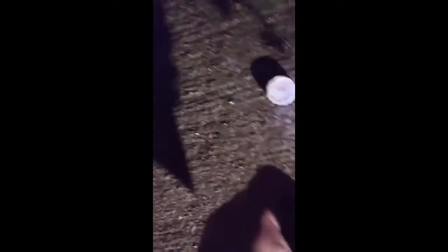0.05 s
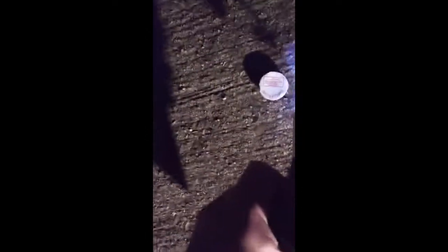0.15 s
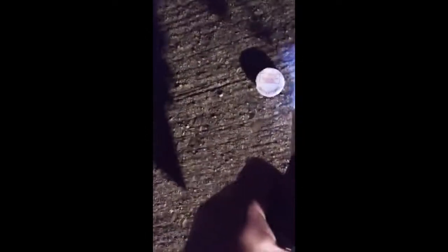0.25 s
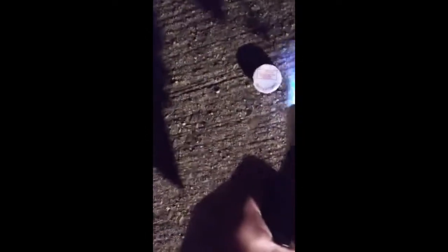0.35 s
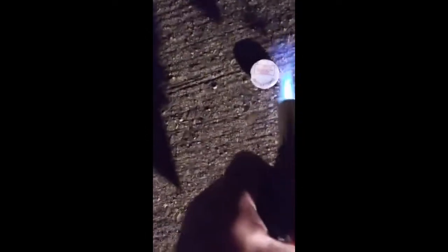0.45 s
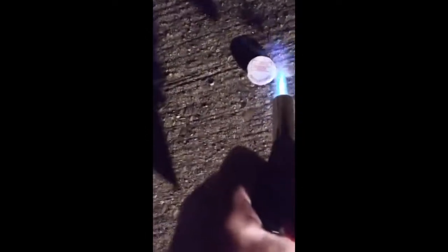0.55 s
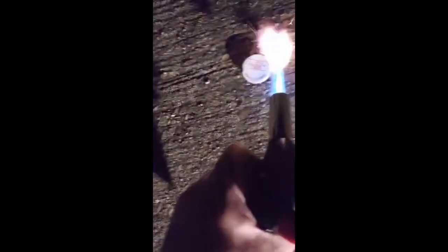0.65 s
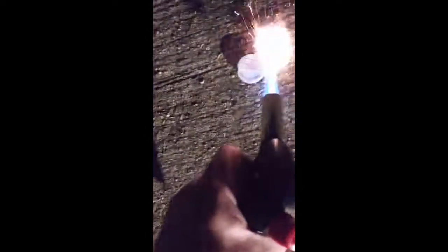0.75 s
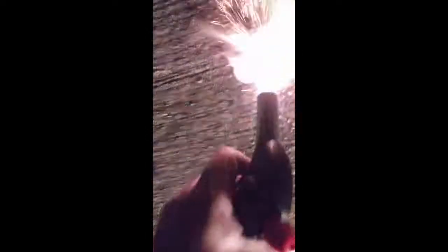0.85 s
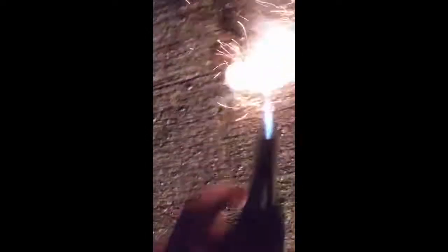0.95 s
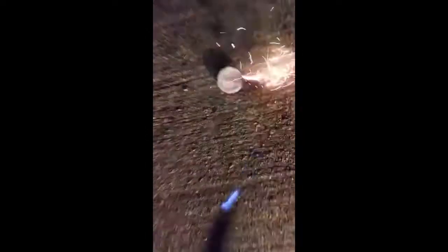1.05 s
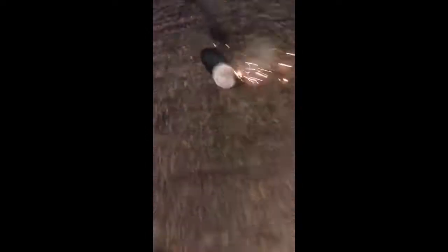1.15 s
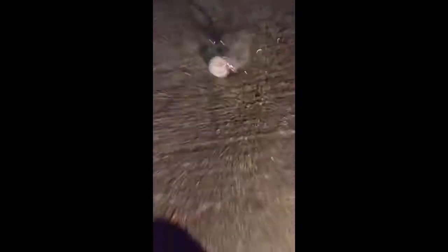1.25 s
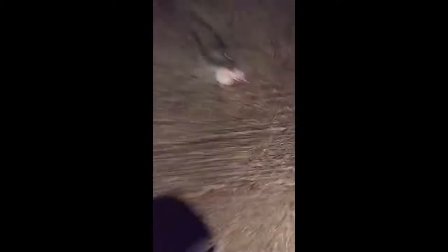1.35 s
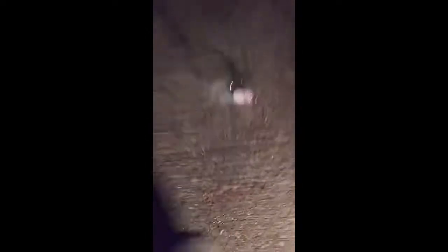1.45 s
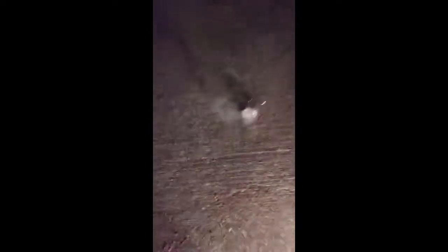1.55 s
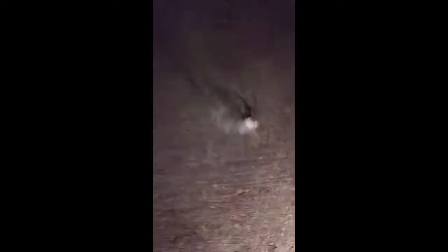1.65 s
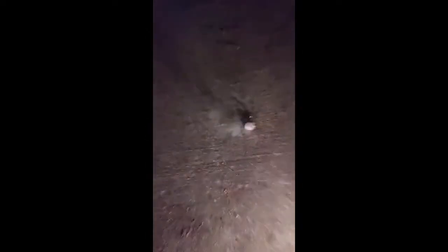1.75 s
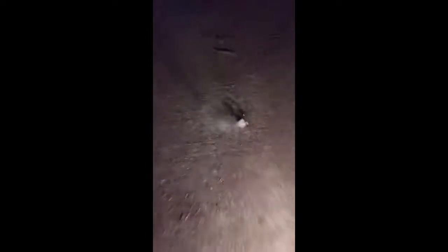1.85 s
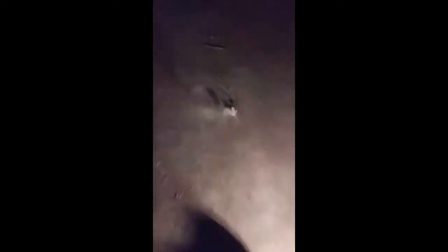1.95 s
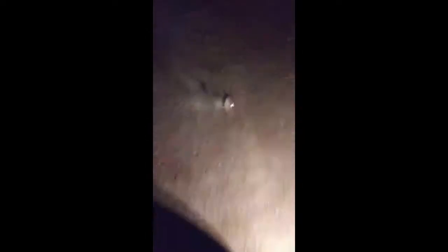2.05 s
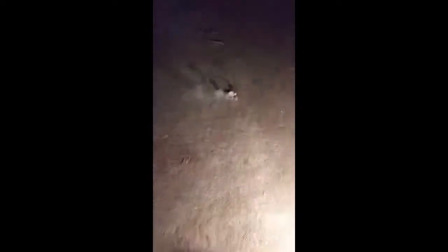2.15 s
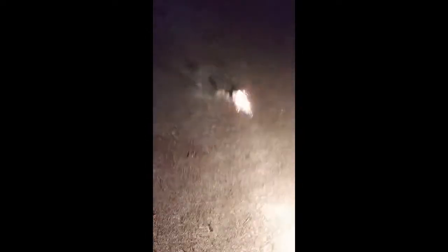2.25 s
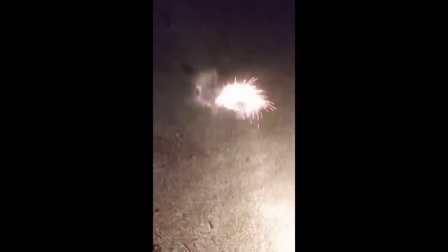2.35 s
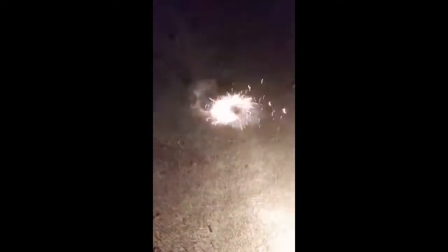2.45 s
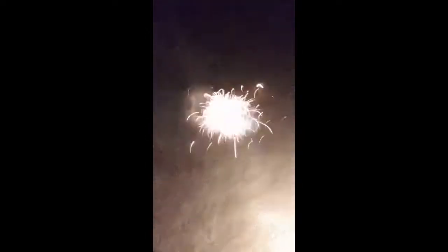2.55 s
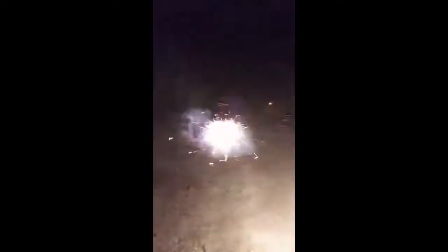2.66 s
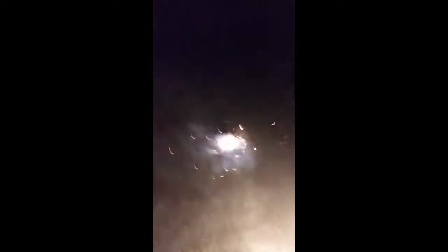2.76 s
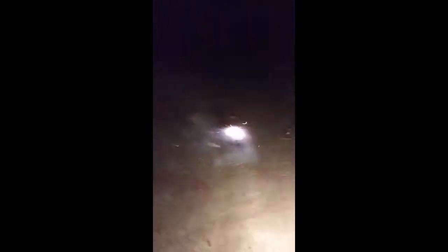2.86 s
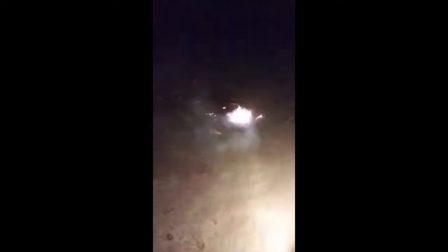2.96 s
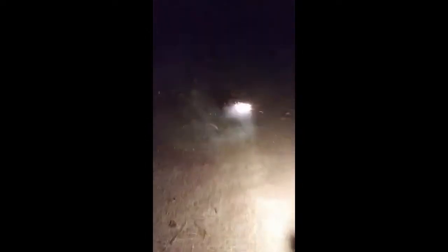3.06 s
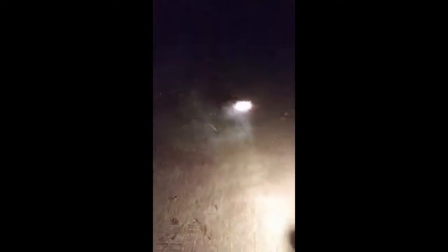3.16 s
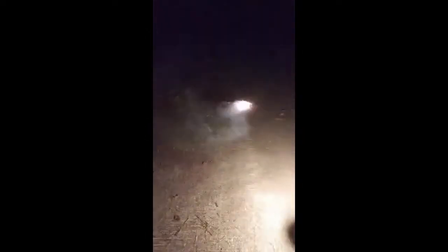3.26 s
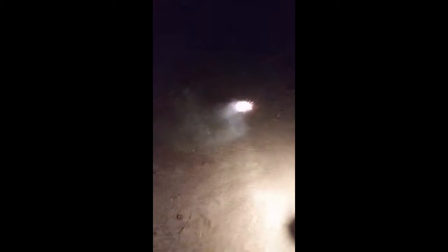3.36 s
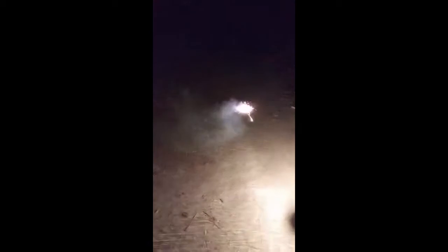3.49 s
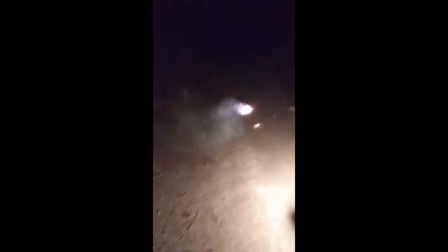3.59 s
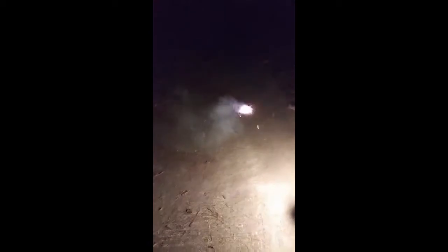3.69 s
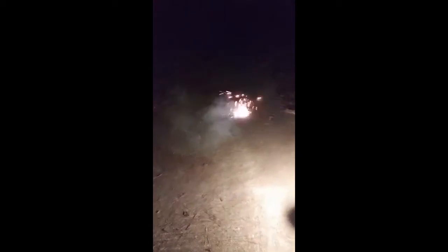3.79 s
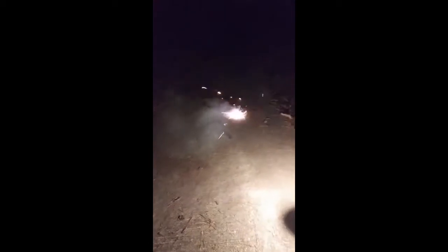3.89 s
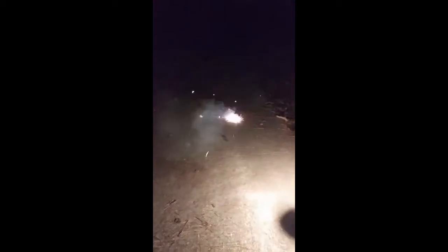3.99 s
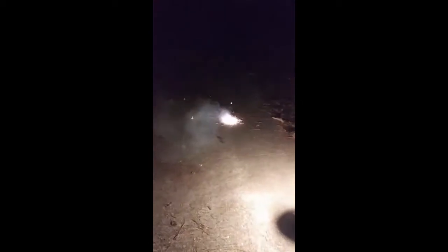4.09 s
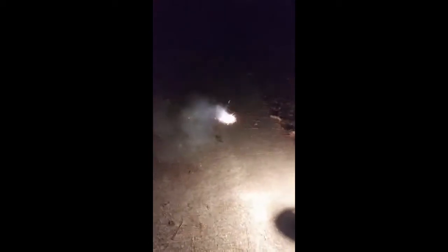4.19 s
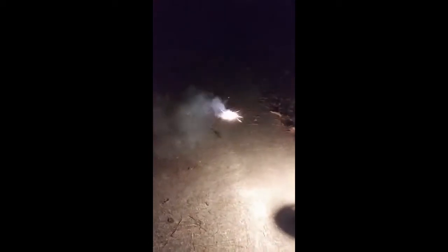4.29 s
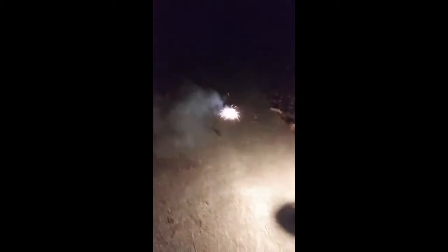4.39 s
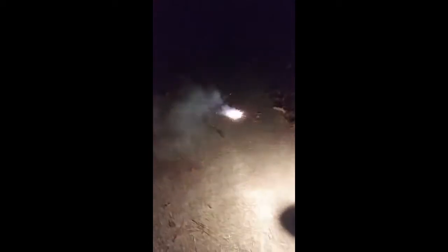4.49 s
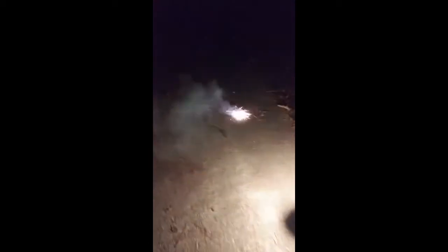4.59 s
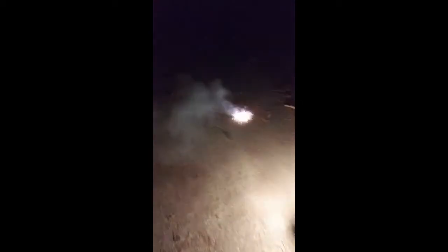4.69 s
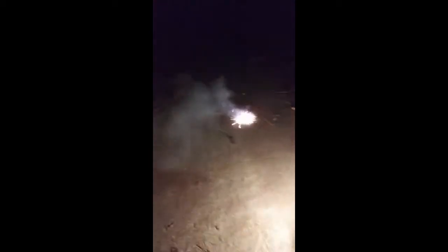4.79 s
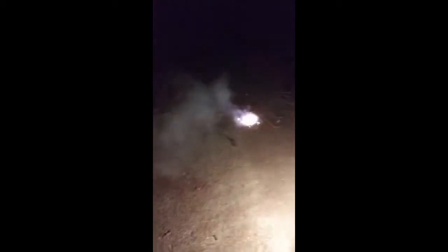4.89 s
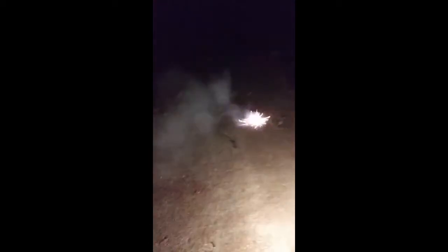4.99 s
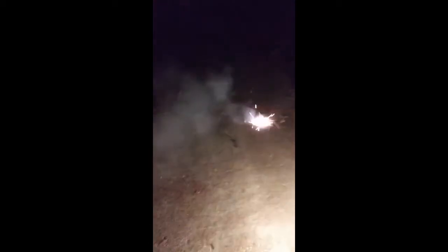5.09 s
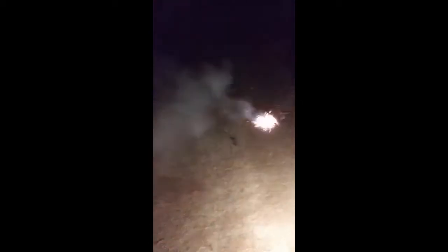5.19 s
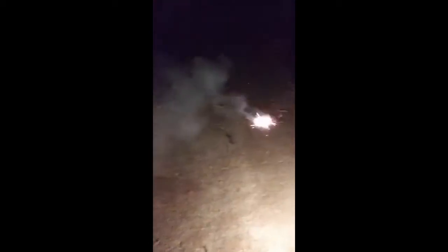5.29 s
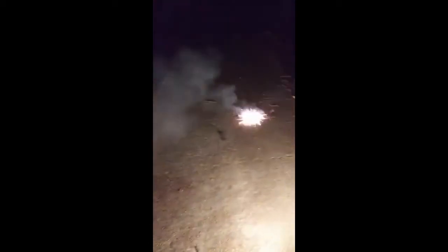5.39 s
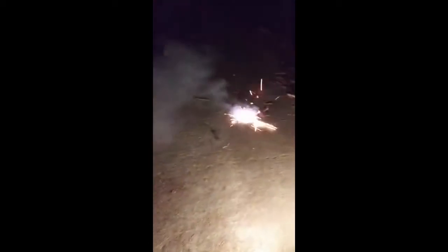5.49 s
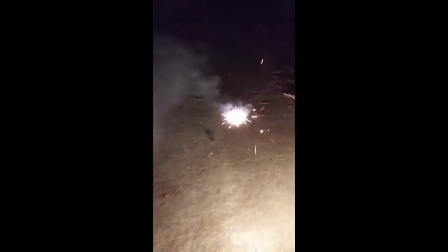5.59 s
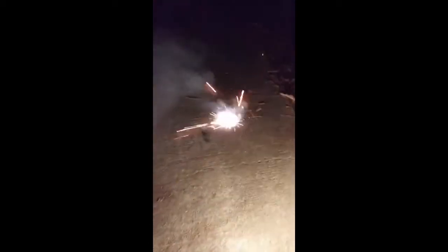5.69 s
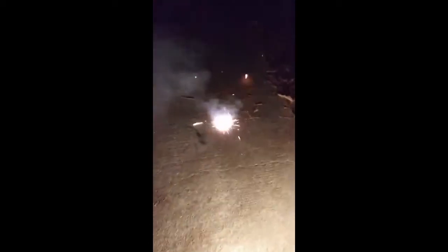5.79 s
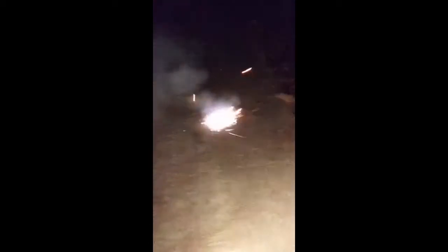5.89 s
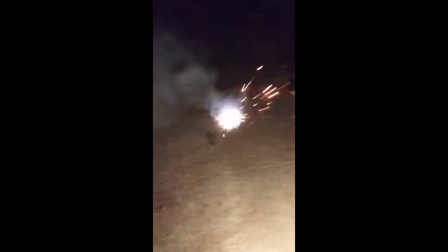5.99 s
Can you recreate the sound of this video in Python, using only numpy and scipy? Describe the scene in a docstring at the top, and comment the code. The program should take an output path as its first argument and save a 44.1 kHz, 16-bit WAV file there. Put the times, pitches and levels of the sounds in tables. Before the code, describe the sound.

Outdoors at night on concrete, a handheld gas torch roars steadily right by the microphone for a second, then shuts off with a loud sharp click. A fuse ticks and spits faintly among small handling knocks. The little firework suddenly bursts into a loud, bright, surging hiss, dies back with a tiny whistle, and continues as a quieter, uneven sizzle over faint distant traffic hum.

```python
"""A gas torch roars close by, lights a small ground firework on concrete and is clicked off.
The fuse smoulders and spits, the charge flares into a loud hiss and settles to a steady burn.
Flame, gas and powder are shaped noise; clicks and knocks are damped modes struck by short blows.
Reflections near the hand-held camera comb the burn; distant traffic hums through the night."""
import sys
import numpy as np
from scipy import signal
from scipy.fft import rfft, irfft, next_fast_len
from scipy.io import wavfile

SR = 44100
rng = np.random.default_rng(int(sys.argv[2]) if len(sys.argv) > 2 else 0)


def digitize_waveform(pressure):
    """Quantize a signal to 16-bit integers and store it at the path in sys.argv[1].

    Rows of a 2-D input are taken as channels; values are limited to [-1, 1].
    """
    field = np.atleast_2d(pressure).T
    bounded = np.clip(field, -1, 1)
    quanta = np.round(bounded * 32767).astype(np.int16)
    wavfile.write(sys.argv[1], SR, quanta)


def attenuation_scalar(level_db):
    """Turn a level in dB into a linear amplitude multiplier (20 dB per decade)."""
    decades = np.asarray(level_db, float) / 20
    return 10 ** decades


N = 266364


def evened(x):
    """Normalisation: scales x to rms 1."""
    return x / np.sqrt(np.mean(x ** 2) + 1e-20)


def curve(points):
    """Linear interpolation: draws each column after the first over the time in seconds."""
    s, *columns = np.transpose(points)
    return [np.interp(np.arange(N) / SR, s, column) for column in columns]


def add(mix, s, sound):
    """Superposition: adds a sound to the mix from s seconds on."""
    part = mix[round(s * SR):][:len(sound)]
    part += sound[:len(part)]


def coloured(x, spectrum):
    """Linear filtering: weights x by a spectrum over log frequency and returns it at rms 1."""
    hz, db = np.transpose(spectrum)
    size = next_fast_len(N)
    log_hz = np.log(np.fft.rfftfreq(size, 1 / SR) + 1)
    weight = attenuation_scalar(np.interp(log_hz, np.log(hz + 1), db))
    return evened(irfft(rfft(x, size) * weight, size)[:N])


def resonate(x, hz, width_hz):
    """Resonance: a two-pole peak with gain near 1 at its centre."""
    sharpness = max(hz / width_hz, .3)
    return signal.lfilter(*signal.iirpeak(np.clip(hz, 50, 20000), sharpness, SR), x)


def flutter(hz):
    """Random modulation: noise low-passed at hz, rms 1."""
    return evened(signal.lfilter(*signal.butter(2, hz, fs=SR), rng.standard_normal(N)))


def muffled(x):
    """Band limiting: the microphone's port passes little of a click's lowest and highest edges."""
    return signal.sosfilt(signal.butter(3, [250, 9500], "band", fs=SR, output="sos"), x)


# Spectrum of the night air. Each row: frequency in Hz, relative density in dB per Hz.
NIGHT_SPECTRUM = [(15, -68), (25, -97), (71, -12), (183, -2), (305, -5), (469, -1), (537, 0), (895, -1.5),
                  (1530, -14), (1950, -19.5), (2120, -22), (5140, -21), (5730, -27), (7700, -12),
                  (15500, -75)]
NIGHT_DB = -44.5


def night():
    """Stationary noise, slowly modulated: distant traffic and a faint high wash swell a little."""
    wash = coloured(rng.standard_normal(N), NIGHT_SPECTRUM)
    return wash * attenuation_scalar(NIGHT_DB + 0.69 * flutter(hz=3.7))


# Grit and handling knocks near the camera. Each row: start in seconds, level in dB, frequency in Hz.
KNOCK_ROWS = [(1.2519, -28.5, 1630), (1.2523, -27.5, 4000), (1.286, -25.5, 1420), (1.519, -30, 1960),
              (1.581, -24, 1010), (1.5934, -22.5, 834), (1.601, -27, 920), (1.6096, -24, 910),
              (1.938, -37, 1900), (2.077, -35, 960), (2.117, -41, 1900), (2.316, -30.5, 2170),
              (2.317, -32, 3400), (2.955, -29.5, 1370), (3.8435, -29, 3700), (3.8432, -28.5, 930),
              (3.859, -20.5, 1660), (3.859, -28, 4020), (3.864, -28, 1650), (3.868, -24, 1600)]
KNOCK_CYCLES, KNOCK_GRIT = 17, 0.66  # cycles in which a knock dies by 60 dB; grit peak over ring peak


def knocks():
    """Damped vibration: each knock is a few cycles of one mode with a puff of grit around it."""
    out, t = np.zeros(N), np.arange(2000) / SR
    noises = rng.standard_normal((len(KNOCK_ROWS), len(t)))
    for (s, db, hz), noise in zip(KNOCK_ROWS, noises):
        onset = 1 - np.exp(-t / 0.00015)
        ring = np.sin(2 * np.pi * hz * t) * onset * attenuation_scalar(-60 * t * hz / KNOCK_CYCLES)
        grit = resonate(noise, 1.8 * hz, 1.3 * hz) * attenuation_scalar(-60 * t / 0.012)
        add(out, s, attenuation_scalar(db) * (ring / abs(ring).max() + KNOCK_GRIT * grit / abs(grit).max()))
    return out


# Broad roar of the blue flame. Each row: frequency in Hz, relative density in dB per Hz.
ROAR_SPECTRUM = [(24, -81), (40, -55), (170, -1), (903, 1), (1080, -9.5), (1220, -5.5), (3470, -39),
                 (3930, -60), (5170, -8), (6320, -26.5), (8730, -15), (9890, -39), (15500, -70)]
# Resonances of the nozzle. Each row: frequency in Hz, width in Hz of each of two passes,
# relative level in dB, change as the torch turns in dB per second.
NOZZLE_MODES = [(2620, 1400, -2, -0.5), (3300, 230, -13, -5), (5000, 230, -1.5, -4.5),
                (5410, 450, -5.5, 2.5), (5630, 470, -4, -1.5), (6700, 240, -1, -8), (7990, 250, -8, -0.5),
                (8500, 1300, -6, -21)]
# Gas flow; the jet hisses on a moment after the flame dies.
# Each row: time in seconds, relative flame level in dB, relative jet level in dB.
GAS_FLOW = [(0, -3.5, -2), (.2, -0.5, -2), (.5, -0.5, -3), (.8, 0, -1.5), (1.0, -1, 0.5), (1.03, 1, -6),
            (1.06, -9, -2), (1.115, -23, -9), (1.14, -27, -31)]
ROAR_DB, NOZZLE_DB = -32.5, -41


def torch():
    """Turbulence noise: a flame roars and a jet rings the nozzle, both following the gas flow."""
    off_s = GAS_FLOW[-1][0]
    roar = coloured(rng.standard_normal(N), ROAR_SPECTRUM) * attenuation_scalar(ROAR_DB + 1.1 * flutter(hz=29.8))
    jet = rng.standard_normal(N)
    t = np.minimum(np.arange(N) / SR, off_s)
    nozzle = np.zeros(N)
    for hz, width, db, turn in NOZZLE_MODES:
        mode = evened(resonate(resonate(jet, hz, width), hz, width))
        nozzle += attenuation_scalar(db + turn * t + 0.4 * flutter(hz=9.3)) * mode
    flame_db, jet_db = curve(GAS_FLOW)
    lit = np.arange(N) < off_s * SR
    return (attenuation_scalar(flame_db) * roar + attenuation_scalar(NOZZLE_DB + jet_db) * evened(nozzle)) * lit


# Blows of the trigger. Each row: start in seconds, peak in dB,
# time constant of the rattle in seconds, centre frequency in Hz.
TRIGGER_BLOWS = [(1.011, -17, 0.003, 9150), (1.0179, -2, 0.00053, 5000), (1.0482, -11.5, 0.0041, 5500),
                 (1.051, -14, 0.0009, 3620)]
# Modes of the valve body. Each row: frequency in Hz, relative level in dB, 60 dB decay in seconds.
VALVE_MODES = [(1900, -28, 0.015), (2920, -17, 0.062), (3650, -3, 0.021), (5100, 3, 0.0074),
               (5360, 10, 0.0051), (6720, 12, 0.0033), (9900, -2, 0.0085)]


def trigger():
    """Modal excitation: short rattles of impacts, densest in energy at their start, ring the valve body."""
    out, t = np.zeros(N), np.arange(2000) / SR
    ring = sum(attenuation_scalar(db - 60 * t / t60) * np.sin(2 * np.pi * hz * t) for hz, db, t60 in VALVE_MODES)
    noises = rng.standard_normal((len(TRIGGER_BLOWS), 2, len(t)))
    for (s, db, decay_s, hz), (rattle, crack) in zip(TRIGGER_BLOWS, noises):
        fade = np.exp(-t / decay_s)
        hit = np.convolve(rattle * fade, ring)
        hit = hit / abs(hit).max()
        hit[:len(t)] += 0.64 * crack * fade  # the dry crack on top
        thud = np.pad(crack * np.exp(-t / 0.0026), (0, len(t) - 1))
        hit = resonate(muffled(hit) + 0.025 * hit, hz, 3300) + 0.11 * resonate(thud, 1100, 1600)
        add(out, s, attenuation_scalar(db) * hit / abs(hit).max())
    return out


WHISTLE_S, WHISTLE_LENGTH_S, WHISTLE_DB = 2.965, 0.157, -41
WHISTLE_HZ, RISE_HZ_PER_S = 1060, 950


def whistle():
    """Narrow-band noise: as the flare dies, the vent whistles briefly on a wavering, rising pitch."""
    t = np.arange(N) / SR - WHISTLE_S
    hz = WHISTLE_HZ + RISE_HZ_PER_S * np.clip(t, 0, WHISTLE_LENGTH_S)
    waver = signal.lfilter(*signal.butter(1, 35, fs=SR), rng.standard_normal((2, N)))
    envelope = .5 + evened(waver[0]) + 1j * evened(waver[1])
    tone = (envelope * np.exp(2j * np.pi * np.cumsum(hz) / SR)).real
    fade = np.clip(np.minimum(t, WHISTLE_LENGTH_S - t) / 0.0083, 0, 1)
    return attenuation_scalar(WHISTLE_DB) * evened(tone) * fade


SMALL_FROM_S, SMALL_TO_S, SMALL_HZ = 1.14, 2.25, 6500
SMALL_DB, SMALL_SPREAD_DB = -39, 2.5  # base level; spread per natural-log unit of size


def small_sparks(count):
    """Random point process: rows for the faint pops, crowding early in the fuse's life."""
    when, size, pitch = rng.random((count, 3)).T
    s = SMALL_FROM_S + (SMALL_TO_S - SMALL_FROM_S) * when ** 2
    db = SMALL_DB - SMALL_SPREAD_DB * np.log(size + .05)
    return list(zip(s, db, SMALL_HZ * (1 + .7 * (pitch - .5))))


# The loudest sparks. Each row: start in seconds, level in dB, centre frequency in Hz.
LOUD_POPS = [(1.1794, -30, 7500), (1.2802, -30, 4160), (1.3124, -22, 7560), (1.338, -30, 7510),
             (1.398, -27, 7140), (1.4207, -22, 7530), (1.4775, -29, 7040), (1.519, -23, 4300),
             (1.5514, -29, 6800), (1.6367, -29.5, 7880), (1.979, -25, 7250), (1.992, -28, 7270),
             (2.0327, -23.5, 7300), (2.1799, -24, 8600), (3.3343, -23.5, 6790), (3.483, -24, 7060)]
POP_T60_S = 0.008


def sparks():
    """Impulsive noise: each pop is a click and a dying puff, heard through one broad resonance."""
    rows = LOUD_POPS + small_sparks(count=20)
    out, t = np.zeros(N), np.arange(3000) / SR
    for (s, db, hz), noise in zip(rows, rng.standard_normal((len(rows), len(t)))):
        puff = noise * attenuation_scalar(-60 * t / POP_T60_S) + 5.0 * (t == 0)
        puff = resonate(puff, hz, hz / 1.8)
        add(out, s, attenuation_scalar(db) * puff / abs(puff).max())
    return muffled(out)


# Loose powder spits short puffs of gas. Each row: start in seconds, length in seconds, hiss level in dB.
SPIT_ROWS = [(1.501, 0.037, -40.5), (1.585, 0.032, -43.5), (1.973, 0.029, -50), (2.028, 0.018, -50),
             (2.174, 0.024, -48), (3.29, 0.055, -43), (3.458, .03, -41.5), (3.843, 0.027, -41)]
SPIT_RISE_S, SPIT_FALL_S = 0.0027, 0.017  # soft edges, centred on the start and the end


def spits():
    """Amplitude envelope: the gain of the puffs has a quick rise, a hold and a slower fall."""
    t = np.arange(N) / SR
    gain = np.zeros(N)
    for s, length, db in SPIT_ROWS:
        edges = np.minimum((t - s) / SPIT_RISE_S, (s + length - t) / SPIT_FALL_S)
        gain += attenuation_scalar(db) * np.clip(edges + .5, 0, 1) ** 2
    return gain


SPUTTER, FIZZ_SPUTTER = 0.21, 0.73  # amplitude share of grains, 0 to 1


def powder():
    """Granular noise: two rows of steady noise mixed with chance grains, for the gas and for the fizz."""
    sputter = np.array([[SPUTTER], [FIZZ_SPUTTER]])
    grains = (rng.random(N) < 900 / SR) * attenuation_scalar(1.7 * np.minimum(rng.exponential(1, N), 3))  # about 900 a second
    t = np.arange(300) / SR
    decay = attenuation_scalar(-60 * t / 0.0012)
    grains = evened(signal.oaconvolve(grains, decay)[:N] * rng.standard_normal(N))
    drive = np.sqrt(1 - sputter ** 2) * rng.standard_normal(N) + sputter * grains
    return drive * attenuation_scalar(1.0 * flutter(hz=23.4) + 1.46 * flutter(hz=126))  # uneven powder


# Spectra of the gas hiss, the duller flame body and the finest fizz.
# Each row: frequency in Hz, relative density in dB per Hz.
HISS_SPECTRUM = [(1000, -44), (1700, -32), (2040, -7), (2340, -15.5), (2540, -11), (2770, -13.5),
                 (3070, -11), (4330, -3.5), (4810, -7), (5290, -2.5), (5870, -1.5), (6620, 0), (7060, 3.5),
                 (9340, -2), (11500, -27), (15000, -86), (22000, -120)]
BODY_SPECTRUM = [(60, -53), (150, -18), (300, -3), (600, -3.5), (1000, 5), (2000, -3), (2800, -10),
                 (3300, -5.5), (5000, -18), (10000, -40)]
FIZZ_SPECTRUM = [(8500, -29), (10500, 8.5), (11500, -2.5), (13000, -7), (15700, -11)]
# The fuse smoulders, then the charge flares in three surges and settles.
# Each row: time in seconds, hiss level in dB, flame body level in dB.
BURN_LEVELS = [(1.1, -62, -39.5), (1.16, -59, -65), (1.28, -47.5, -50.5), (1.45, -51.5, -54),
               (1.63, -58, -61), (2.29, -59, -92), (2.33, -46, -53), (2.36, -29, -40), (2.435, -17, -30),
               (2.488, -27, -26.5), (2.52, -17.5, -29), (2.57, -24.5, -31.5), (2.594, -16.5, -27),
               (2.67, -12.5, -24.5), (2.73, -17.5, -25.5), (2.768, -16, -25.5), (2.805, -24.5, -28.5),
               (2.835, -32.5, -37.5), (2.91, -35, -43.5), (3.05, -50, -40.5), (3.25, -53, -46),
               (3.36, -50, -41), (3.44, -51, -40.5), (3.57, -36.5, -35.5), (3.75, -52.5, -43),
               (3.95, -42.5, -41.5), (4.03, -46.5, -40), (4.15, -39, -36), (4.46, -45.5, -39.5),
               (4.88, -43, -36), (4.99, -45.5, -40.5), (5.1, -61, -38.5), (5.146, -45.5, -38.5),
               (5.25, -44.5, -37.5), (5.35, -44, -33.5), (5.4, -46.5, -41.5), (5.6, -43.5, -37),
               (5.82, -37, -34), (5.94, -42, -37), (6.04, -37.5, -33.5)]
# The finest fizz. Each row: time in seconds, level relative to the hiss in dB.
FIZZ_LEVELS = [(1.1, -37), (2.2, -15), (2.3, -11), (2.44, -11.5), (2.52, -21), (2.67, -14.5), (2.75, -26),
               (2.85, -12.5), (3.2, -8.5), (3.57, -26), (3.8, -11), (4.1, -27), (4.8, -30), (4.97, -13),
               (5.15, -39), (5.45, -13), (5.8, -24), (6.04, -13)]
SPIT_BODY_DB, SPIT_FIZZ_DB = -2.5, -34  # flame body and fizz of a spit relative to its hiss


def burn():
    """Jet and combustion noise: hot gas hisses over the duller flame and grains of powder crackle."""
    hiss_db, body_db = curve(BURN_LEVELS)
    fizz_db = hiss_db + curve(FIZZ_LEVELS)[0]
    puffs = spits()
    hiss = np.hypot(attenuation_scalar(hiss_db), puffs)  # puffs add in power
    body = np.hypot(attenuation_scalar(body_db), attenuation_scalar(SPIT_BODY_DB) * puffs)
    fizz = np.hypot(attenuation_scalar(fizz_db), attenuation_scalar(SPIT_FIZZ_DB) * puffs)
    gas_drive, fizz_drive = powder()
    layers = hiss * coloured(gas_drive, HISS_SPECTRUM) + body * coloured(gas_drive, BODY_SPECTRUM)
    layers += fizz * coloured(fizz_drive, FIZZ_SPECTRUM)
    return layers * (np.arange(N) > BURN_LEVELS[0][0] * SR)


# Path by way of the ground, later the higher the camera is held.
# Each row: time in seconds, mean delay in milliseconds, strength at low frequencies from 0 to 1.
GROUND_BOUNCE = [(2.3, 0.77, .5), (2.43, 0.6, 0.33), (2.64, 0.76, 0.35), (2.8, 0.82, 0.3), (2.92, 1.1, 0.7),
                 (3.1, 1.03, 0.15), (3.45, 1.02, 0.27), (3.57, 1.11, 0.54), (3.92, 1.05, 0.7),
                 (4.27, 1.175, 0.5), (4.4, 1.145, 0.64), (4.7, 1.12, 0.53), (4.96, 1.035, 0.35),
                 (5.19, 0.897, 0.6), (5.36, 0.85, 0.6), (5.52, 0.84, 0.4), (5.68, 0.78, 0.5),
                 (5.78, 0.73, 0.27), (5.9, 0.58, 0.6), (6.04, 0.556, 0.45)]
HAND_MS, HAND_SHARE = .42, .36  # bounce off hand and camera body
SIDE_MS, SIDE_SHARE = 0.366, 0.1  # a weaker path that trails the bounce
AGAIN_SHARE = .12  # times the bounce itself, kept by each further repeat
DULL_HZ, WANDER_MS = 4500, .012  # treble loss of the bounce; rms wander of its delay with the flame


def reflected(x):
    """Interference: delayed copies add to the direct sound, and their comb notches slide through the hiss."""
    hz, t, z = signal.stft(x, SR, nperseg=512, noverlap=384)
    s, *columns = np.transpose(GROUND_BOUNCE)
    ms, share = (np.interp(t, s, column) for column in columns)
    hz = hz[:, None]
    ms = ms + WANDER_MS * flutter(hz=19)[np.minimum(t * SR, N - 1).astype(int)]
    late, side, near = (np.exp(-2j * np.pi * hz * delay / 1000) for delay in (ms, SIDE_MS, HAND_MS))
    high_loss = 1 + (hz / 8000) ** 4
    late = share * late / np.sqrt(1 + (hz / DULL_HZ) ** 4 / high_loss)
    copies = late * (1 + SIDE_SHARE * side) / (1 - AGAIN_SHARE * late)
    hand = 1 + HAND_SHARE / high_loss * near
    z *= hand * (1 + copies) / np.sqrt(1 + abs(late) ** 2)  # offsets the power the bounce adds
    return signal.istft(z, SR, nperseg=512, noverlap=384)[1][:N]


def scene():
    """Superposition: night, handling, torch and firework sum as one channel."""
    firework = reflected(burn() + sparks()) + whistle()
    return (night() + knocks() + torch() + trigger() + firework)[None]


def top_cut(x):
    """Nothing passes above the cut-off."""
    return signal.sosfilt(signal.butter(12, 15750, fs=SR, output="sos"), x)


# Hiss of the preamp. Each row: frequency in Hz, relative density in dB per Hz.
PREAMP_SPECTRUM = [(6000, -14), (10000, -7), (12000, -12), (15700, -24)]
PREAMP_DB = -64.5


def record(dry):
    """Saturation: the preamp hisses faintly, rounds the loudest peaks and cuts the deepest bass."""
    hiss = attenuation_scalar(PREAMP_DB) * coloured(rng.standard_normal(N), PREAMP_SPECTRUM)
    rounded = 1.051 * np.tanh((dry + hiss) / 1.111)
    finished = signal.lfilter(*signal.butter(1, 60, "high", fs=SR), rounded)
    return top_cut(finished)


dry = scene()
out = record(dry)
digitize_waveform(out)
```